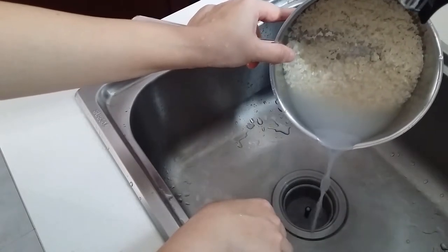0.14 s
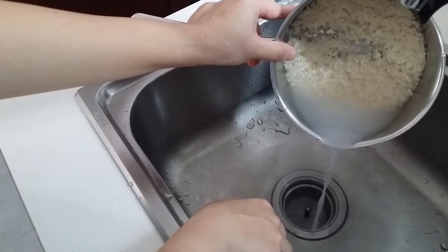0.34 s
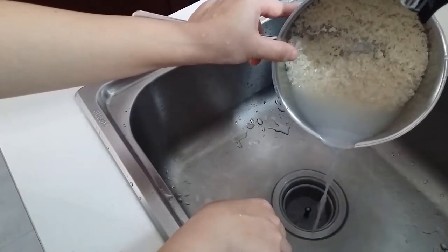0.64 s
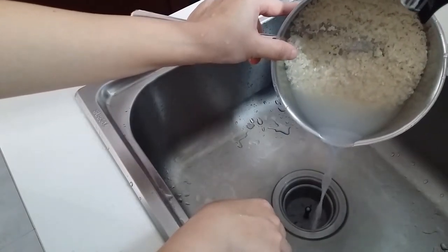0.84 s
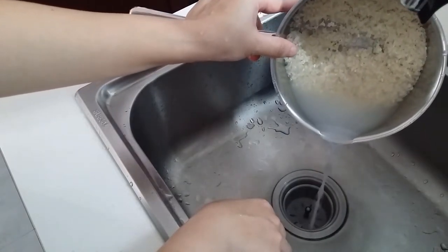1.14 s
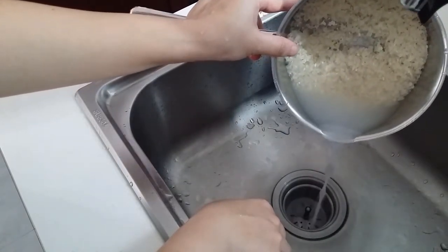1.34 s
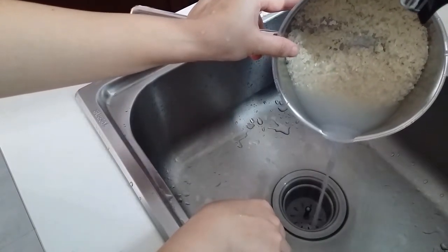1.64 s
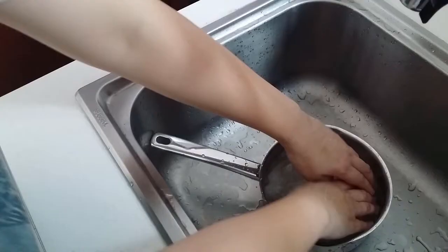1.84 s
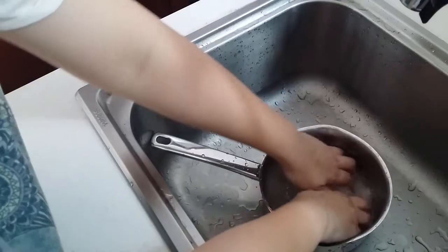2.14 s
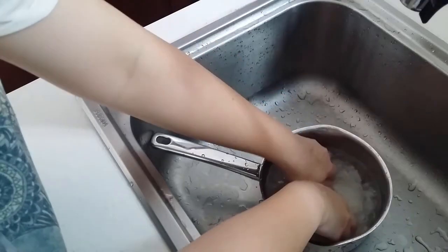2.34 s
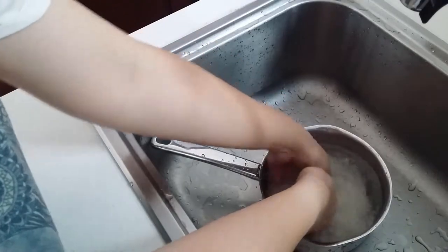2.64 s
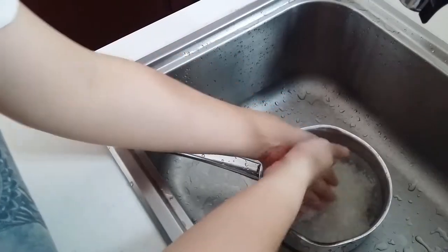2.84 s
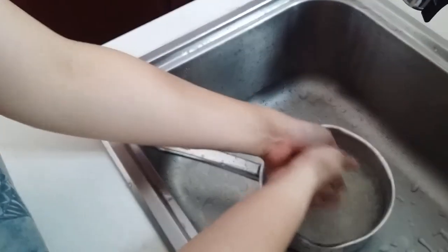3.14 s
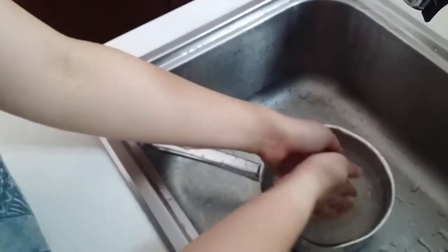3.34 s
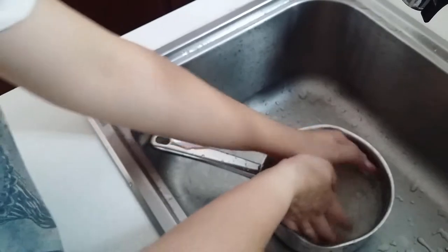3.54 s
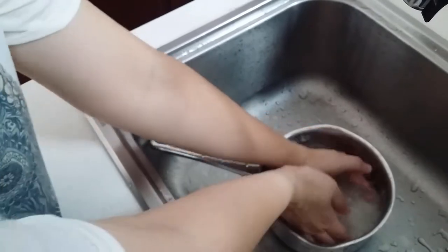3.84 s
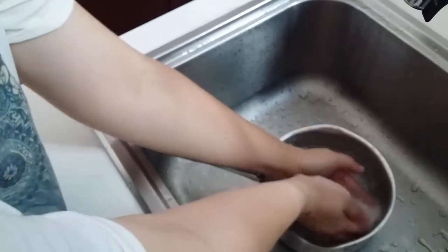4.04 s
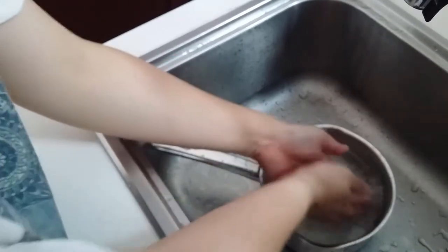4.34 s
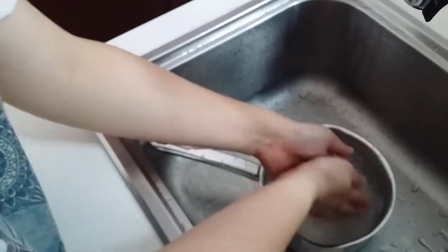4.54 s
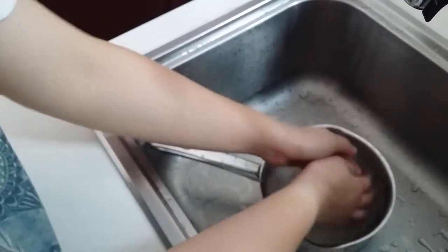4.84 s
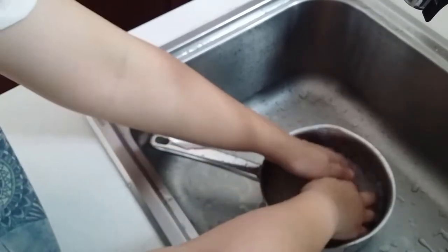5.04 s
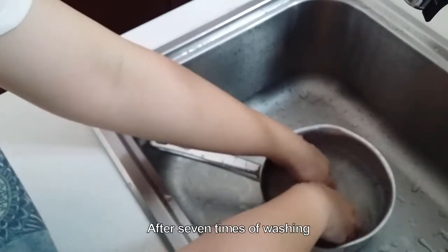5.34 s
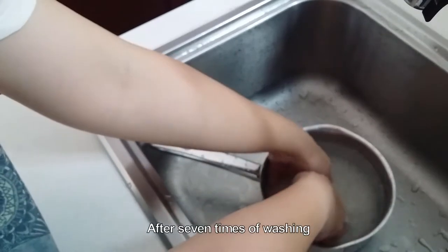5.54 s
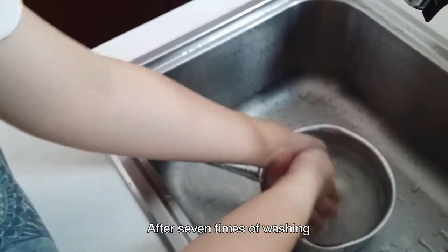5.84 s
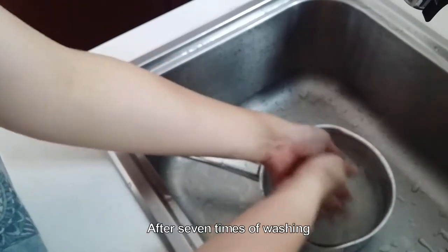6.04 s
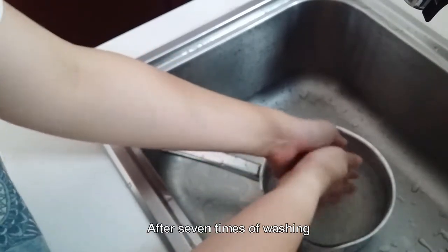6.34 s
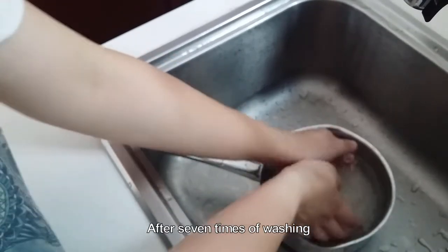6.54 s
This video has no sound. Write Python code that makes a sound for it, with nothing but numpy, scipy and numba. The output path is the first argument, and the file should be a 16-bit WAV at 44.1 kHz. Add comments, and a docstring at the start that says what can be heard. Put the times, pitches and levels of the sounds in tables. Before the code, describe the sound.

A thin, faltering stream of water patters into a steel sink drain, then hands rub wet rice in a pot in three bouts of gritty, sloshing strokes.

```python
"""A small kitchen, heard in close stereo: rinse water runs thinly from a steel pot into a steel sink's drain.
The stream is droplet clicks and small bubbles; drops are noise bursts; the basin drums as damped modes.
Then two hands scoop wet rice and rub it in three bouts of quick strokes: filtered clicks and bubble swarms
ring in the pot and the hands, while water trickles and drips back. Rumble, hiss and a hum lie beneath."""
import sys
import numpy as np
from scipy import signal
from scipy.fft import rfft, irfft
from scipy.io import wavfile
from numba import njit

SR = 44100
rng = np.random.default_rng(int(sys.argv[2]) if len(sys.argv) > 2 else 0)


def put_to_file(sound):
    """Save the sound as 16-bit audio at rate SR, in the file named by the first command-line argument."""
    columns = np.atleast_2d(sound).T  # one column per channel
    safe = np.clip(columns, -1, 1)
    whole_steps = np.round(safe * 32767)
    wavfile.write(sys.argv[1], SR, whole_steps.astype(np.int16))


N = 294588
TIME_S = np.arange(N) / SR

# Flow of the stream on the drain, nearly breaking off once: (time [s], spatter level [dB])
STREAM_FLOW = [(0, -54), (.15, -60), (.33, -57), (.46, -59), (.6, -61), (.79, -65), (.86, -61),
               (.96, -65.5), (1.08, -57.5), (1.16, -66), (1.255, -80.5), (1.3, -63.5), (1.56, -60.5),
               (1.65, -68.5), (1.7, -52.5), (1.801, -65), (1.93, -63), (2.15, -92)]
# Droplet spatter spectrum: (frequency [Hz], relative level [dB])
SPATTER_SPECTRUM = [(900, -9), (2400, -20.5), (3200, -3), (4400, -11.5), (6000, -6.5), (8000, -6.5),
                    (11000, -1.5), (15500, 0.5)]
# Strainer resonances: (frequency [Hz], width [Hz], level [dB])
STRAINER_MODES = [(3120, 190, -20), (8200, 420, -8)]
# Stream pattering into water pooled on the strainer: (time [s], level [dB])
PATTER_FLOW = [(0, -53.5), (.15, -62.5), (.33, -73), (.42, -57), (.5, -51), (.6, -64.5), (.8, -78),
               (.87, -69), (1.15, -74), (1.38, -85), (1.43, -67), (1.62, -67.5), (1.76, -63), (1.9, -84)]
# Ring of that pool: (frequency [Hz], width [Hz], level [dB])
POOL_MODES = [(5240, 220, -1.5), (5800, 120, 3.5), (6900, 170, 3)]
# Empty basin resonances: (frequency [Hz], width [Hz], level [dB])
BASIN_MODES = [(198.7, 2.7, -3), (260, 43, 1), (357, 23, -10), (580, 380, -11.5), (993, 61, -7.5)]
# Dull thuds of the basin floor under water gulps and the pot: (time [s], level [dB], pitch [Hz], T60 [s])
BASIN_THUDS = [(0.279, -41, 237, 0.14), (0.534, -47, 234, 0.076), (0.989, -41, 242, 0.071),
               (1.902, -43.5, 183, 0.081), (1.939, -54.5, 140, 0.39)]
# Basin modes with the pot standing in it: (frequency [Hz], width [Hz], level [dB])
LOADED_BASIN_MODES = [(104, 7.2, -2), (302, 6, -5), (363, 11, -7), (590, 11, -6.5), (2015, 13, -16)]
# Pot shifting on the basin floor under the hands: (time [s], peak level [dB])
POT_SETTLE = (5.708, -52)
# Loudest drops, squirts and wet snaps: (time [s], level [dB], centre [Hz], burst decay [s])
LOUD_DROPS = [(.065, -44.5, 6700, 0.0022), (.094, -48, 11300, .001), (.129, -45, 6600, 0.0019),
              (.171, -36.5, 8630, .002), (.213, -39.5, 9100, 0.0031), (.25, -45, 13400, .002),
              (.279, -38.5, 8100, 0.0022), (.296, -41, 8000, 0.0021), (.362, -49, 10500, .002),
              (.378, -43.5, 10050, 0.0018), (.427, -38.5, 8000, 0.011), (.492, -51, 5400, .006),
              (.506, -45.5, 5200, 0.0047), (.516, -44, 8300, 0.0017), (.615, -37, 7620, 0.0018),
              (.667, -47.5, 9600, .002), (.688, -40.5, 11300, .0015), (.708, -45, 12000, 0.00086),
              (.749, -44.5, 9760, 0.00077), (.806, -48, 13000, 0.0014), (.837, -45.5, 7700, 0.0011),
              (.862, -48, 6500, .004), (.877, -43.5, 12500, 0.00066), (1.06, -37.5, 12000, 0.0024),
              (1.085, -39, 12600, 0.0017), (1.404, -43.5, 11630, 0.0018), (1.419, -50.5, 6600, .004),
              (1.473, -41.5, 9000, .0012), (1.51, -48, 9300, 0.002), (1.568, -38, 6600, 0.0013),
              (1.647, -57, 4650, 0.0027), (1.684, -46.5, 10000, 0.0029), (1.69, -45.5, 5620, 0.011),
              (1.712, -45.5, 8330, .006), (1.753, -42, 5800, 0.0097), (1.777, -46.5, 10900, .004),
              (1.841, -38.5, 8440, 0.0014), (1.876, -46.5, 7540, 0.0018), (1.888, -38.5, 5240, 0.0039),
              (2.518, -53.5, 10700, 0.002), (2.795, -50, 5070, 0.0034), (3.031, -33, 5600, 0.0017),
              (3.051, -42, 4050, 0.0011), (3.061, -36, 6160, 0.0011), (3.136, -28, 5700, .001),
              (3.615, -44.5, 4230, .003), (3.69, -39, 6200, 0.0029), (3.724, -45, 5630, 0.0027),
              (3.803, -33.5, 5100, 0.0016), (3.814, -33.5, 4200, 0.0027), (4.453, -50, 5550, 0.0019),
              (4.485, -43.5, 5060, .003), (4.608, -37.5, 3940, .0015), (4.617, -52, 4600, .002),
              (4.647, -34.5, 5900, 0.0013), (4.708, -32.5, 3980, .002), (4.733, -36, 5670, 0.0018),
              (4.886, -38, 3610, 0.0017), (4.938, -27, 4420, 0.0018), (4.943, -35, 7750, .004),
              (4.989, -37, 5430, 0.003), (5.128, -42.5, 7070, 0.003), (5.14, -39, 5400, 0.0037),
              (6.054, -46.5, 7860, 0.0023), (6.066, -38.5, 7200, 0.0038), (6.345, -31.5, 3970, 0.0014),
              (6.44, -52, 3550, .002), (6.497, -51, 4960, .003), (6.52, -57, 4430, 0.0023),
              (6.566, -47, 5000, 0.0045), (6.584, -46, 4330, .002), (6.6, -38.5, 5000, 0.0047)]
# Large bubbles, and at 4.936 s a knock on the pot ringing at 1130 Hz: (time [s], level [dB], pitch [Hz], T60
# [s])
LARGE_BUBBLES = [(.919, -58.5, 2940, 0.059), (.95, -50.5, 5060, .02), (.958, -54.5, 4000, .025),
                 (.96, -53, 7030, 0.018), (0.991, -55, 7700, .025), (1.348, -54, 9240, 0.038),
                 (2.387, -51, 1164, 0.026), (2.39, -56, 2860, 0.027), (2.812, -50, 3700, 0.034),
                 (2.866, -50.5, 2310, 0.027), (3.398, -19.5, 2650, 0.028), (3.688, -48.5, 3450, 0.13),
                 (3.817, -34, 3360, .021), (3.82, -46, 4750, 0.11), (4.205, -54.5, 2960, 0.029),
                 (4.237, -61, 1350, .03), (4.33, -64, 2520, .03), (4.358, -39, 2680, 0.024),
                 (4.404, -37, 1514, 0.049), (4.564, -35, 3210, 0.03), (4.936, -32.5, 1130, 0.012),
                 (4.936, -28.5, 1700, 0.0064), (6.601, -43.5, 4150, 0.078)]
# Strainer cup gulping water: (middle [s], level [dB], pitch [Hz], half length [s], glide [Hz/s])
CUP_GULPS = [(.222, -57.5, 3040, 0.006, 0), (.3, -65, 3300, 0.014, -5000), (.565, -67, 3220, 0.019, 5000),
             (.71, -70.5, 3420, 0.033, 0), (1.219, -52.5, 3470, 0.0042, 12000), (1.3, -70, 3450, .012, 0),
             (1.467, -71, 3100, 0.0033, 4), (1.544, -51, 3440, 0.003, -15000),
             (1.777, -50, 3640, .014, -12000), (1.825, -59.5, 3640, 0.026, 0)]
# Air squeezed out of the rice by the fingers: (middle [s], level [dB], pitch [Hz], half length [s], glide [Hz/s])
RICE_SQUELCHES = [(2.815, -61.5, 3800, 0.021, 0), (2.963, -50, 3210, 0.0083, 0),
                  (3.026, -36.5, 3280, .004, 0), (3.585, -51.5, 2940, 0.01, 15000),
                  (3.785, -58.5, 3720, 0.0073, 0), (4.47, -58, 5060, 0.016, 0), (4.525, -61, 3350, .025, 0),
                  (4.59, -54, 3470, .016, 5000), (4.73, -53, 1770, 0.014, -6000),
                  (4.806, -38, 3380, 0.0044, 0), (4.81, -63, 1624, 0.021, -1500),
                  (5.105, -60.5, 3900, 0.011, 0), (6.069, -57, 3330, 0.0045, 0),
                  (6.177, -49.5, 3460, 0.0068, 0), (6.218, -55.5, 1940, .016, -1500),
                  (6.31, -57.5, 1900, 0.013, 0), (6.352, -45, 3600, 0.0059, 0), (6.58, -54, 4000, 0.011, 0)]
# Stereo balance of sound from the pot: (frequency [Hz], left minus right [dB])
POT_BALANCE_DB = [(500, -15), (1000, -2.5), (1600, -10), (2400, 1), (3400, -4.5), (5600, 0), (8000, -4.5),
                  (15000, -4)]
# Room tone spectrum: (frequency [Hz], relative level [dB])
ROOM_SPECTRUM = [(22, -45), (38, -20), (58, -1.5), (100, -5.5), (190, -6.5), (370, -7), (480, -15.5),
                 (650, -12), (950, -21), (2000, -23.5), (4000, -28.5), (6500, -27.5), (8000, -30.5),
                 (15500, -34.5)]
# Left-right likeness of the room tone: (frequency [Hz], likeness [0-1])
ROOM_LIKENESS = [(30, 0.94), (250, 0.89), (500, 0.8), (1000, 0), (3000, 0), (16000, 0)]
# Faint appliance hum: (frequency [Hz], RMS level [dB])
APPLIANCE_HUM = (145.2, -78.5)
# Rice sliding as the pot is righted and stirred: (middle [s], wet grain [dB], slosh [dB], half length [s])
RICE_STIRS = [(1.773, -51.5, -71, 0.02), (1.98, -68.5, -77, 0.11), (2.23, -66.5, -70.5, 0.024),
              (2.35, -65, -71, 0.044), (2.678, -66.5, -71.5, 0.18), (2.84, -72, -65.5, 0.094),
              (3.481, -42.5, -61, 0.028), (3.566, -46.5, -76, 0.016), (3.71, -59, -62, 0.023),
              (3.817, -54.5, -66.5, 0.029), (4.211, -89, -68, 0.016), (4.377, -68.5, -59.5, 0.033),
              (5.133, -56.5, -65, 0.02), (5.788, -71.5, -73.5, 0.051), (5.988, -72, -76, 0.047),
              (6.49, -56, -64.5, 0.013), (6.608, -49.5, -71, 0.011)]
# Handfuls lifted, held dripping, let go: (lift [s], let go [s], wet grain [dB], slosh [dB])
RICE_HANDFULS = [(2.964, 3.579, -47.5, -60.5), (4.522, 4.986, -50, -63.5), (6.077, 6.614, -56, -73.5)]
# Palms rubbing rice: (middle [s], wet grain [dB], slosh [dB], half length [s], cupped-hand pitch [Hz])
PALM_STROKES = [(3.049, -30, -45, 0.021, 3580), (3.141, -32.5, -40, 0.02, 2050),
                (3.225, -33.5, -40.5, 0.014, 3000), (3.304, -29.5, -39.5, 0.018, 2620),
                (3.395, -30.5, -40.5, 0.027, 2660), (4.642, -32.5, -55, 0.016, 3450),
                (4.729, -34, -56, 0.016, 3500), (4.815, -38.5, -51.5, 0.035, 3400),
                (6.105, -37, -73, 0.022, 4350), (6.2, -34, -48, 0.02, 4040),
                (6.296, -34.5, -50, 0.022, 3760), (6.371, -35, -50, 0.016, 3650)]
# Wet grain spectrum: (frequency [Hz], relative level [dB])
WET_RICE_SPECTRUM = [(900, -32), (1400, -29.5), (2200, -18), (2750, -15.5), (3150, -4), (4600, 0),
                     (6600, 0), (7600, -5.5), (10500, -9.5), (15500, -21)]
# Slosh spectrum: (frequency [Hz], relative level [dB])
SLOSH_SPECTRUM = [(1020, -9), (1270, -19.5), (1720, -2), (2100, 1.5), (2900, 5)]
# Pot, strainer cup and basin resonances: (frequency [Hz], width [Hz], level [dB])
POT_MODES = [(1038, 49, 5), (1815, 91, -5.5), (2370, 70, -6), (2620, 120, -3), (3890, 160, -1),
             (5790, 540, -6), (6600, 300, -12)]
# Water slopping back as the pot is righted: (middle [s], level [dB], half length [s])
SLOP_BACK = (1.977, -61, 0.072)
# Hollow notes of that water: (frequency [Hz], width [Hz], level [dB])
SLOP_MODES = [(166, 40, 3.5), (271, 85, 0.5), (364, 50, -5), (577, 42, -2.5)]
# Grains scraped along the steel: (middle [s], level [dB], half length [s])
GRAIN_SCRAPES = [(1.987, -67, 0.031), (2.237, -62.5, 0.029), (2.389, -62, 0.046), (2.802, -72, 0.03),
                 (3.697, -52.5, 0.022), (4.449, -61, 0.034), (4.53, -69, 0.068), (5.099, -58, 0.0096)]
# Pot wall resonances: (frequency [Hz], width [Hz], level [dB])
POT_WALL_MODES = [(3300, 70, -26), (5980, 99, 4), (6600, 360, 4.5), (9300, 640, 3), (12000, 1500, -5)]

GURGLE_DB = -16.5  # re spatter
# The drumming has DRUM_DB at the usual flow and follows a share of the flow's dB swing.
USUAL_FLOW_DB, DRUM_DB, DRUM_FOLLOWS = -57, -63.5, 0.51
STRAYS_PER_S, STRAY_BURST_S = 48, 0.00077
STRAY_DB, STRAY_SPREAD_DB = 2.0, 5.5  # re spatter, and +/- range
STRAY_LOW_HZ, STRAY_HIGH_HZ = 5400, 14400
HANDS_IN_S, RESTING_DB = 2.0, -78.5  # wet rice is never quite still from then on
LIFT_DB_PER_S, RELEASE_DB_PER_S = 327, 398
# Water pressed out by a stroke runs on through the fingers: level re stroke, and decay.
RUNOFF_DB, RUNOFF_DB_PER_S = -29, 70
# The trickle has TRICKLE_DB at the usual grain level and follows a share of the grain's dB swing.
TRICKLE_DB, USUAL_GRAIN_DB, TRICKLE_FOLLOWS = -56, -44, 0.68
GAP_HZ, GAP_WIDTH_HZ, GAP_DB = 3240, 600, -1
WALL_DB = -3.5  # basin echoes re direct sound
ROOM_TONE_DB, CUTOFF_HZ = -68, 15800


def from_db(db):
    """Amplitude gain of a level in dB."""
    return 10 ** (np.asarray(db) / 20)


def rms_one(x):
    """Scale to RMS 1."""
    return x / np.sqrt(np.mean(x ** 2) + 1e-20)


def unit_energy(x):
    """Scale each row to energy 1."""
    return x / np.sqrt(np.sum(x ** 2, axis=-1, keepdims=True) + 1e-20)


def at_hz(points, hz):
    """Interpolate a spectrum on a log frequency axis."""
    point_hz, values = np.array(points).T
    return np.interp(np.log(np.maximum(hz, 1)), np.log(point_hz), values)


def pan(left_db):
    """Stereo gains with left louder than right by left_db."""
    return from_db(np.array([[left_db], [-left_db]]) / 2)


def add(out, s, sound):
    """Mix a short stereo sound in at time s."""
    i = max(round(s * SR), 0)
    out[:, i:i + sound.shape[1]] += sound[:, :N - i]


def through(x, response):
    """Convolve stereo sound with an impulse response."""
    return signal.fftconvolve(x, np.atleast_2d(response), axes=1)[:, :N]


def tick(spectrum, size=1024):
    """Minimum-phase pulse with this spectrum, by folding the cepstrum."""
    gain = from_db(at_hz(spectrum, np.fft.rfftfreq(size, 1 / SR)))
    cepstrum = irfft(np.log(gain))
    cepstrum[1:size // 2] *= 2
    return irfft(np.exp(rfft(cepstrum[:size // 2], size)))


def body(modes, size=16384):
    """Impulse response of damped modes; energy 1."""
    t = np.arange(size) / SR
    out = np.zeros(size)
    for hz, width_hz, db in modes:
        ring = np.sin(2 * np.pi * hz * t) * np.exp(-np.pi * width_hz * t)
        out += from_db(db) * unit_energy(ring)
    return unit_energy(out)


def resonate(x, modes):
    """A hollow body lifts the bands of its modes and lets them ring."""
    out = x.copy()
    for hz, width_hz, db in modes:
        b, a = signal.iirpeak(hz, hz / width_hz, fs=SR)
        out += from_db(db) * signal.lfilter(b, a, x + 1e-18)
    return out


def gliding_ring(hz, width_hz, x):
    """A resonance whose centre follows hz: shift to 0 Hz, low-pass, shift back."""
    turn = np.exp(2j * np.pi * np.cumsum(hz) / SR)
    r = np.exp(-np.pi * width_hz / SR)
    return np.real(turn * signal.lfilter([(1 - r) ** 2], [1, -2 * r, r * r], x / turn))


def clumps(per_s, depth_db):
    """Uneven bunching: a quickly wandering gain of RMS 1."""
    knots = np.clip(rng.standard_normal(int(per_s * N / SR) + 2), -2, 2)
    return rms_one(from_db(depth_db * np.interp(TIME_S * per_s, np.arange(len(knots)), knots)))


def clicks(per_s, spread_db, side_db=1.0, lag_s=.00016):
    """Random stereo clicks, each of its own size and direction; RMS 1."""
    count = int(per_s * N / SR) + 1
    at = rng.integers(0, N, count)
    sizes = from_db(spread_db * np.minimum(rng.exponential(1, count), 4))
    sizes = sizes * rng.choice([-1, 1], count)
    side = from_db(rng.normal(0, side_db, count) / 2)
    lag = np.round(rng.normal(0, lag_s * SR, count)).astype(int)
    out = np.zeros((2, N))
    np.add.at(out[0], at, sizes / side)
    np.add.at(out[1], (at + lag) % N, sizes * side)
    return rms_one(out)


def bubble(hz, t60_s, rise, swell_cycles=0.94):
    """A ringing air bubble; its pitch goes up by the share rise over its life as it nears the surface."""
    t = np.arange(int(t60_s * SR) + 2) / SR
    ring = np.sin(2 * np.pi * hz * t * (1 + rise * t / t60_s / 2))
    return ring * from_db(-60 * t / t60_s) * (1 - np.exp(-t * hz / swell_cycles))


@njit
def ring_bubbles(starts, sizes, steps, lives, side, lags, rise, length):
    """Each bubble is a swelling, dying sine, slightly rising in pitch, that lives until 60 dB down."""
    out = np.zeros((2, length))
    for k in range(len(starts)):
        for i in range(min(lives[k], length - starts[k] - abs(lags[k]))):
            age = i / lives[k]
            y = sizes[k] * np.sin(steps[k] * i * (1 + rise * age / 2))
            y *= np.exp(-6.9 * age) * min(steps[k] * i / 15, 1.)
            out[0, starts[k] + i + max(-lags[k], 0)] += y / side[k]
            out[1, starts[k] + i + max(lags[k], 0)] += y * side[k]
    return out


def froth(flow, spectrum, low_hz, high_hz, per_s, cycles, spread_db, rise=0.022, side_db=-1.0, lag_s=.00018):
    """A swarm of small bubbles of random pitch, size, life and direction; its level follows the flow."""
    when, pitch, size, life, side, lag = rng.random((int(per_s * N / SR), 6)).T
    starts = (when * N).astype(int)
    hz = low_hz * (high_hz / low_hz) ** pitch
    lives = (cycles * (.5 + life) * SR / hz).astype(int) + 2
    sizes = from_db(at_hz(spectrum, hz) + spread_db * np.minimum(-np.log(1 - size), 4)) * hz
    # Normalise by the summed energy of the decaying sines.
    sizes = sizes / np.sqrt(np.sum(sizes ** 2 * lives) / (4 * np.log(1000) * N))
    lags = np.round((2 * lag - 1) * lag_s * SR).astype(int)
    steps = 2 * np.pi * hz / SR
    return ring_bubbles(starts, sizes * flow[starts], steps, lives, from_db(side_db * side), lags, rise, N)


def air_pockets(rows, width_hz):
    """A rush of water shakes a pocket of air, whose pitch may glide as it changes size."""
    out = np.zeros((2, N))
    for s, db, hz, half_s, glide_hz_per_s in rows:
        t = np.arange(-3 * half_s, 4 * half_s, 1 / SR)
        push = np.exp(-(t / half_s) ** 2 / 2)
        noise = rng.standard_normal(len(t))
        ring = gliding_ring(hz + glide_hz_per_s * t, width_hz, push * noise)
        add(out, s + t[0], from_db(db) * np.linalg.norm(push) * unit_energy(ring) * pan(0))
    return out


def from_pot(x):
    """Reflections in the basin favour one ear or the other, band by band."""
    left = tick([(hz, db / 2) for hz, db in POT_BALANCE_DB])
    right = tick([(hz, -db / 2) for hz, db in POT_BALANCE_DB])
    return through(x, [left, right])


def swell(s, half_s):
    """Power of one movement: a Gaussian around time s, down to 1/e at half_s."""
    return np.exp(-np.minimum(((TIME_S - s) / half_s) ** 2, 60))


def room_tone():
    """A low steady rumble, nearly alike at both ears, under a faint hiss that differs between them."""
    hz = np.fft.rfftfreq(N, 1 / SR)
    mid, side = rfft(rng.standard_normal((2, N))) * from_db(at_hz(ROOM_SPECTRUM, hz))
    alike = np.clip(at_hz(ROOM_LIKENESS, hz), 0, 1)
    noise = irfft(np.sqrt(1 + alike) * mid + np.sqrt(1 - alike) * side * [[1], [-1]], N)
    return from_db(ROOM_TONE_DB) * rms_one(noise) * pan(-1.4)


def hum():
    """An appliance hums on one steady sine."""
    hz, db = APPLIANCE_HUM
    return from_db(db) * np.sqrt(2) * np.sin(2 * np.pi * hz * TIME_S) * pan(-6.0)


def flow_of_stream():
    """Flow as a gain in time; silent after its last point."""
    s, db = np.transpose(STREAM_FLOW)
    return from_db(np.interp(TIME_S, s, db)) * (TIME_S <= s[-1])


def stream():
    """Droplets of the thin stream tick on the strainer, whip up tiny bubbles and gurgle in its cup."""
    flow = flow_of_stream() * clumps(per_s=110, depth_db=3.5)
    ticks = through(flow * clicks(per_s=600, spread_db=7.5), unit_energy(tick(SPATTER_SPECTRUM)))
    fizz = froth(flow, SPATTER_SPECTRUM, 4450, 14840, per_s=330, cycles=260, spread_db=2.5)
    gurgle = froth(flow, SPATTER_SPECTRUM, 2650, 4600, per_s=55, cycles=87, spread_db=7.0)
    spatter = resonate(from_db(-1.0) * ticks + from_db(-1.5) * fizz, STRAINER_MODES)
    return (spatter + from_db(GURGLE_DB) * gurgle) * pan(-7.5)


def patter():
    """Bunches of droplets ring the shallow pool over the strainer."""
    s, db = np.transpose(PATTER_FLOW)
    flow = from_db(np.interp(TIME_S, s, db)) * (TIME_S <= s[-1])
    flow = flow * clumps(per_s=90, depth_db=3.0)
    rings = through(flow * clicks(per_s=900, spread_db=2.0), body(POOL_MODES))
    high_pass = signal.butter(2, 4300, "high", fs=SR, output="sos")
    return signal.sosfilt(high_pass, rings) * pan(1.0)


def basin():
    """The steel floor drums under the stream, thuds at single pitches and groans when the pot settles."""
    drumming = from_db(DRUM_DB) * (flow_of_stream() / from_db(USUAL_FLOW_DB)) ** DRUM_FOLLOWS
    out = through(drumming * clicks(per_s=900, spread_db=3.5, side_db=1.5), body(BASIN_MODES))
    for s, db, hz, t60_s in BASIN_THUDS:
        add(out, s, from_db(db) * bubble(hz, t60_s, rise=0, swell_cycles=0.99) * pan(0))
    groan = body(LOADED_BASIN_MODES)
    onset = (1 - np.exp(-TIME_S / 0.029)) * clumps(per_s=66, depth_db=-3.0)
    groan = groan * onset[:len(groan)]
    s, db = POT_SETTLE
    add(out, s, from_db(db) * groan / np.abs(groan).max() * pan(0))
    return out * pan(-4.5)


def strays():
    """Droplets leave the stream at random, their level following its flow; same columns as LOUD_DROPS."""
    s, flow_db = np.transpose(STREAM_FLOW)
    when, size, pitch = rng.random((int(STRAYS_PER_S * s[-1]), 3)).T
    at_s = when * s[-1]
    db = np.interp(at_s, s, flow_db) + STRAY_DB + STRAY_SPREAD_DB * (2 * size - 1)
    hz = STRAY_LOW_HZ * (STRAY_HIGH_HZ / STRAY_LOW_HZ) ** pitch
    return list(zip(at_s, db, hz, np.full(len(at_s), STRAY_BURST_S)))


def drops(size=2200, rise_s=.0012, spray_s=0.019, spray_db=-17.0, width=1.216, grain_db=5.0,
          apart_db=7.5, ring_db=-8.0, ring_t60_s=0.023):
    """Each drop is a sharp noise burst, a short grainy spray and a trapped bubble ringing at its pitch."""
    out = np.zeros((2, N))
    t = np.arange(size) / SR
    for s, db, hz, burst_s in list(LOUD_DROPS) + strays():
        shape = np.exp(-t / burst_s) + from_db(spray_db) * np.exp(-t / spray_s)
        shape = shape * (1 - np.exp(-t / rise_s))
        band = signal.butter(2, [hz / width, hz * width], "band", fs=SR, output="sos")
        left_right, common, grain = np.split(rng.standard_normal((4, size)), [2, 3])
        burst = shape * from_db(grain_db * grain) * (common + from_db(apart_db) * left_right)
        splat = unit_energy(signal.sosfilt(band, burst) + from_db(-22.5) * burst)
        ring = unit_energy(bubble(hz, ring_t60_s, rise=0.025))
        strength = from_db(db) * np.sqrt(0.0021 * SR)
        add(out, s - rise_s / 2, strength * splat)
        add(out, s, strength * from_db(ring_db) * ring * pan(0))
    return out * pan(-3.5)


def plinks():
    """Large bubbles, and one knock on the pot, ring singly; drain gulps and rice squelches are rougher, broader
    notes."""
    bubbles = np.zeros((2, N))
    for s, db, hz, t60_s in LARGE_BUBBLES:
        add(bubbles, s, from_db(db) * bubble(hz, t60_s, rise=0.036, swell_cycles=3.2) * pan(0))
    in_pot = from_pot(bubbles + air_pockets(RICE_SQUELCHES, width_hz=230)) * pan(-2.5)
    return in_pot + air_pockets(CUP_GULPS, width_hz=330) * pan(-14.5)


def stirring():
    """Power of grain and slosh as the rice slides in the pot."""
    power = np.zeros((2, N))
    for s, grain_db, slosh_db, half_s in RICE_STIRS:
        power += from_db([[grain_db], [slosh_db]]) ** 2 * swell(s, half_s)
    return power


def held(start_s, end_s, rise_db_per_s, fall_db_per_s):
    """Power of something that rises until start, holds, and dies away after end."""
    before_db = rise_db_per_s * np.maximum(start_s - TIME_S, 0)
    after_db = fall_db_per_s * np.maximum(TIME_S - end_s, 0)
    return from_db(-before_db - after_db) ** 2


def hand_work():
    """Grain and slosh gains in time: the hands stir, lift a handful and rub it in strokes."""
    power = stirring()
    power[0] += from_db(RESTING_DB) ** 2 * (TIME_S > HANDS_IN_S)
    for lift_s, let_go_s, grain_db, slosh_db in RICE_HANDFULS:
        handful = held(lift_s, let_go_s, LIFT_DB_PER_S, RELEASE_DB_PER_S)
        power += from_db([[grain_db], [slosh_db]]) ** 2 * handful
    for s, grain_db, slosh_db, half_s, _ in PALM_STROKES:
        runoff = from_db(RUNOFF_DB - RUNOFF_DB_PER_S * np.abs(TIME_S - s)) ** 2 * (TIME_S > s)
        power += from_db([[grain_db], [slosh_db]]) ** 2 * (swell(s, half_s) + runoff)
    return np.sqrt(power)


def trickle():
    """Drips and grains fall from the fingers into the pot, each with a short note of its own."""
    flow = from_db(TRICKLE_DB) * (hand_work()[0] / from_db(USUAL_GRAIN_DB)) ** TRICKLE_FOLLOWS
    return froth(flow, WET_RICE_SPECTRUM, 2857, 10000, per_s=130, cycles=100, spread_db=3.0) * pan(-0.54)


def palm_gap(wet):
    """Air between the palms rings in a broad band that wavers slightly in pitch."""
    hz = GAP_HZ * clumps(per_s=25, depth_db=0.73)
    return 2 * from_db(GAP_DB) * gliding_ring(hz, GAP_WIDTH_HZ, wet)


def cupped_hands(wet, width_hz=800, hollow_db=-2.0):
    """The hollow of the hands rings at each stroke's own pitch and wavers as the fingers move."""
    out = np.zeros((2, N))
    waver = clumps(per_s=45, depth_db=1.0)
    for s, _, _, half_s, hz in PALM_STROKES:
        start, size = round((s - 3 * half_s) * SR), round(6 * half_s * SR)
        squeezed = wet[:, start:start + size] * signal.windows.tukey(size)
        ring = gliding_ring(hz * waver[start:start + size], width_hz, squeezed)
        add(out, start / SR, 2 * ring)
    return from_db(hollow_db) * out


def rice():
    """Wet grains crackle between the palms; squeezed water and air bubble, and all of it rings in the pot."""
    grain, slosh = hand_work()
    grain = grain * clumps(per_s=300, depth_db=1.0)
    contacts = clicks(per_s=2800, spread_db=0.5) + from_db(-9.5) * clicks(per_s=170, spread_db=2.5)
    crackle = through(grain * contacts, unit_energy(tick(WET_RICE_SPECTRUM)))
    squelch = froth(grain, WET_RICE_SPECTRUM, 2870, 7314, per_s=1100, cycles=89, spread_db=2.0)
    gurgle = froth(slosh, SLOSH_SPECTRUM, 954, 2875, per_s=1500, cycles=24.7, spread_db=1.6)
    glugs = froth(slosh, SLOSH_SPECTRUM, 1539, 2760, per_s=150, cycles=66, spread_db=1.0)
    wet = from_db(-4.0) * crackle + from_db(-6.0) * squelch
    wet = wet + from_db(-5.5) * gurgle + from_db(-6.5) * glugs
    return from_pot(resonate(wet, POT_MODES) + palm_gap(wet) + cupped_hands(wet))


def slop():
    """Water left in the pot runs back: a swell of clicks excites low hollow notes."""
    s, db, half_s = SLOP_BACK
    splashes = np.sqrt(swell(s, half_s)) * clicks(per_s=380, spread_db=-1.5, side_db=4.5)
    return from_db(db) * through(splashes, body(SLOP_MODES)) * pan(-1.8)


def scrape():
    """Stirred grains tick against the pot wall and make its modes ring."""
    power = sum(from_db(db) ** 2 * swell(s, half_s) for s, db, half_s in GRAIN_SCRAPES)
    return through(np.sqrt(power) * clicks(per_s=450, spread_db=3.0), body(POT_WALL_MODES)) * pan(-2.8)


def kitchen(x, wall_s=0.0042, apart_db=-1.5, room_db=-13.5, room_t60_s=0.34, count=24):
    """Quick echoes between the basin walls, partly alike at both ears, then the diffuse tail of the room."""
    t = np.arange(SR // 2) / SR
    echoes = np.zeros((3, len(t)))
    for row in echoes:
        row[rng.integers(SR // 1500, SR // 50, count)] = rng.choice([-1, 1], count)
    echoes = unit_energy(echoes * np.exp(-t / (2 * wall_s)))
    walls = unit_energy(echoes[2] + from_db(apart_db) * echoes[:2])
    tail = rng.standard_normal(walls.shape) * from_db(-60 * t / room_t60_s) * (1 - np.exp(-t / 0.005))
    b, a = signal.butter(1, 9000, fs=SR)
    tail = unit_energy(signal.lfilter(b, a, tail))
    return through(x, unit_energy((t == 0) + from_db(WALL_DB) * walls + from_db(room_db) * tail))


def scene():
    """Stream, rice and drops reflect in basin and kitchen; basin, slop, room tone and hum are added direct."""
    reflected = stream() + patter() + drops() + plinks() + rice() + trickle() + scrape()
    return kitchen(reflected) + basin() + slop() + room_tone() + hum()


def record(dry):
    """Steep low-pass at CUTOFF_HZ."""
    return signal.sosfilt(signal.ellip(10, .1, 80, CUTOFF_HZ, fs=SR, output="sos"), dry)


dry = scene()
out = record(dry)
put_to_file(out)
```